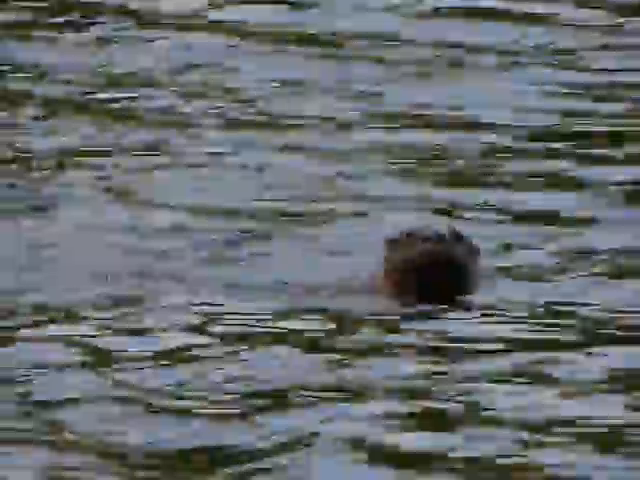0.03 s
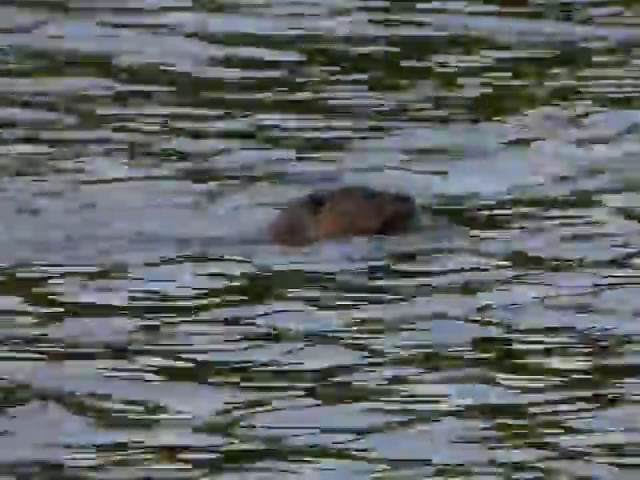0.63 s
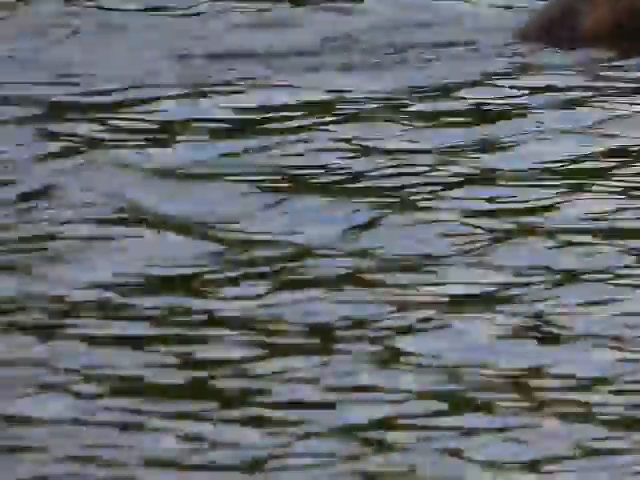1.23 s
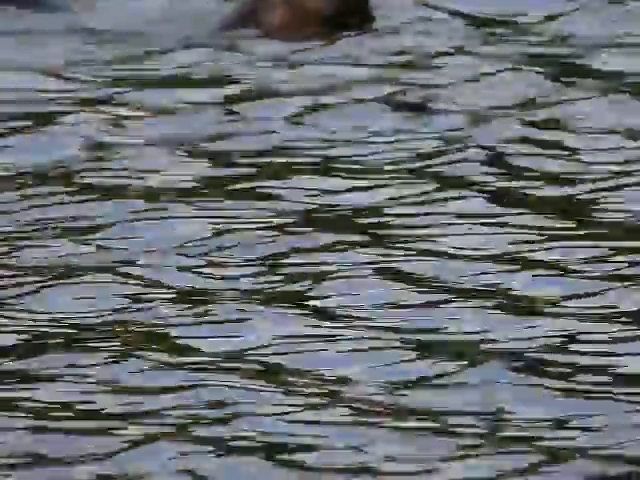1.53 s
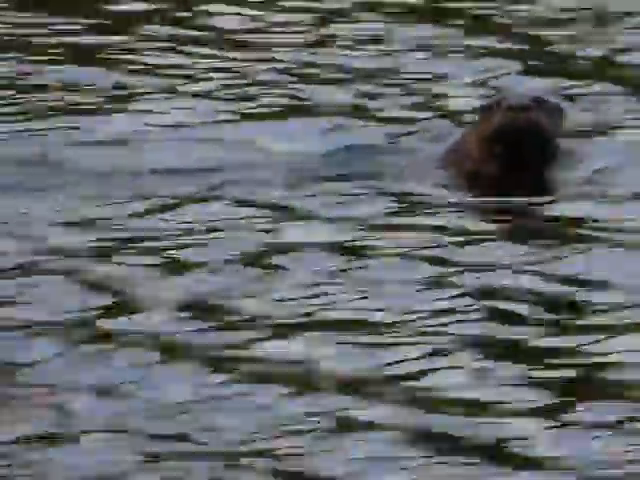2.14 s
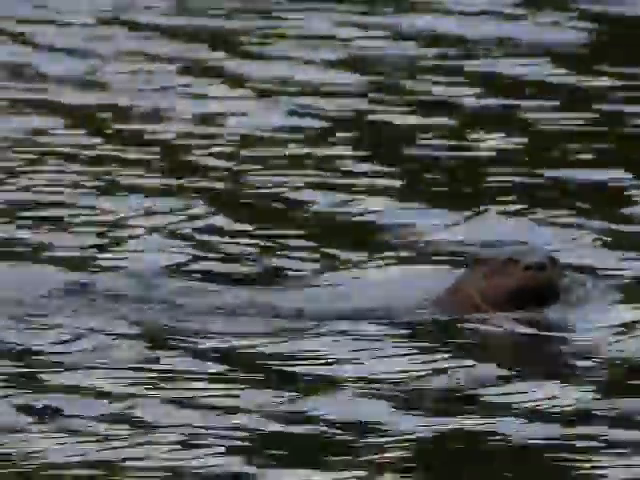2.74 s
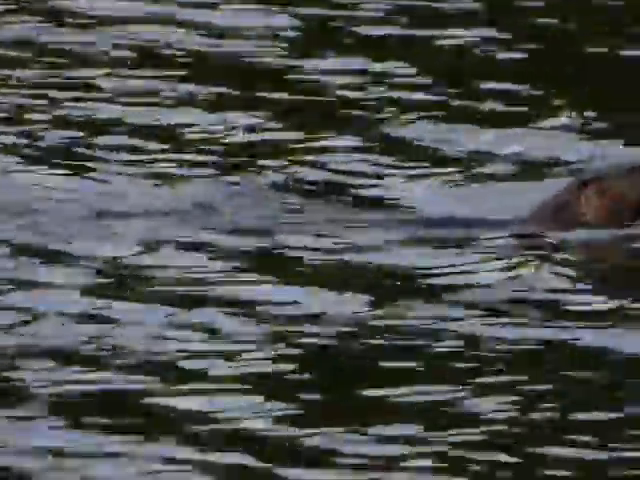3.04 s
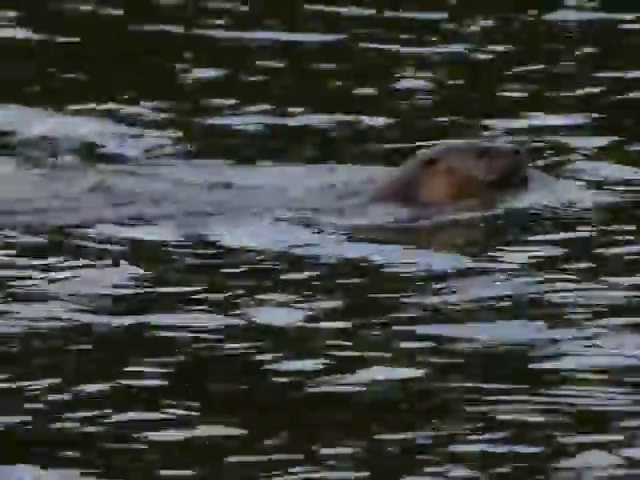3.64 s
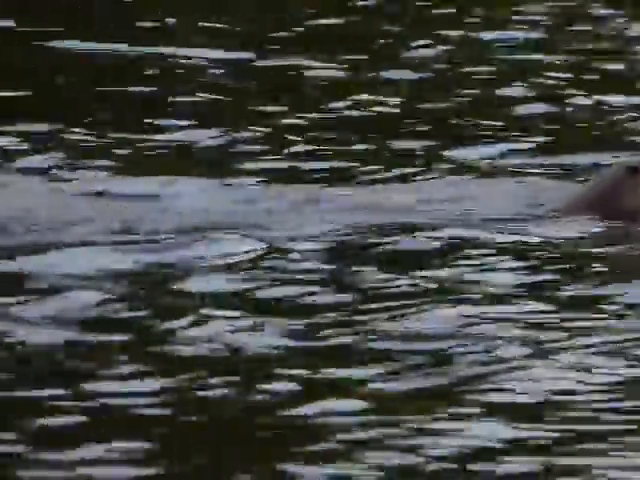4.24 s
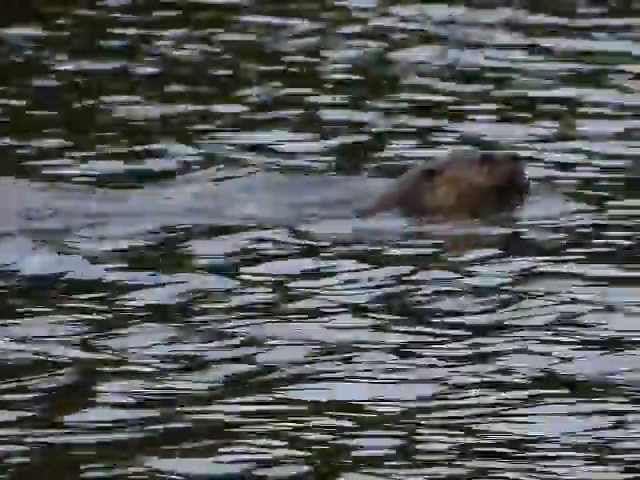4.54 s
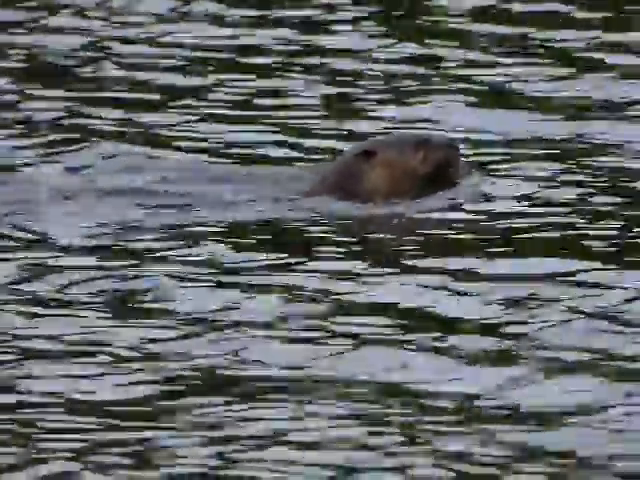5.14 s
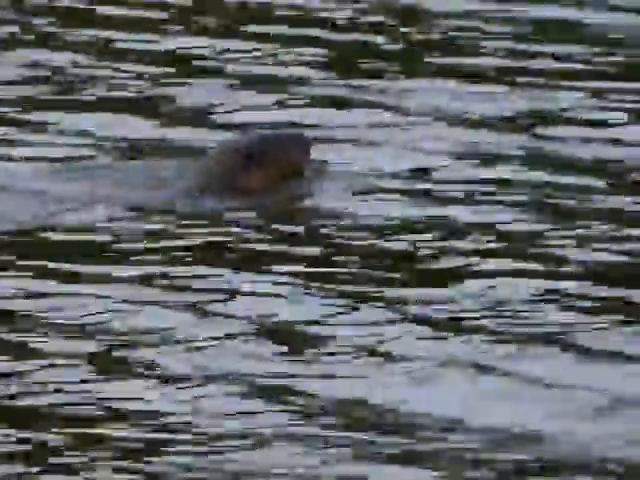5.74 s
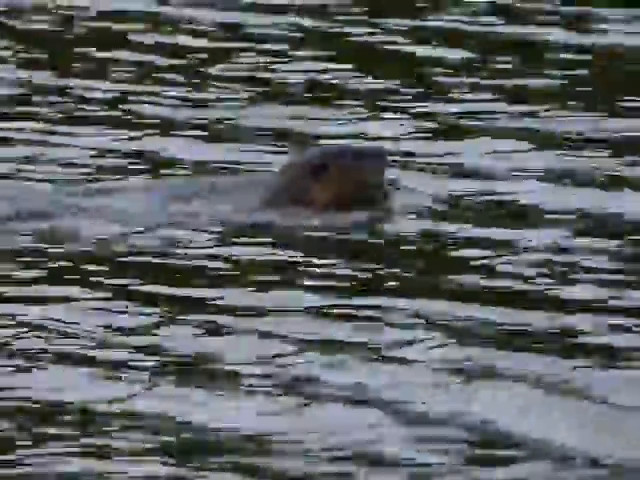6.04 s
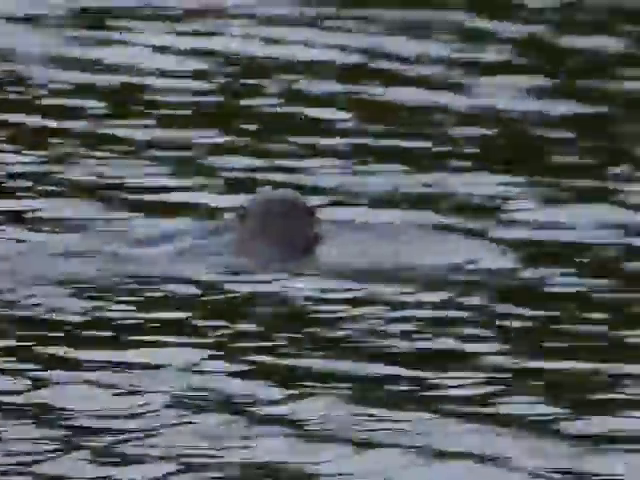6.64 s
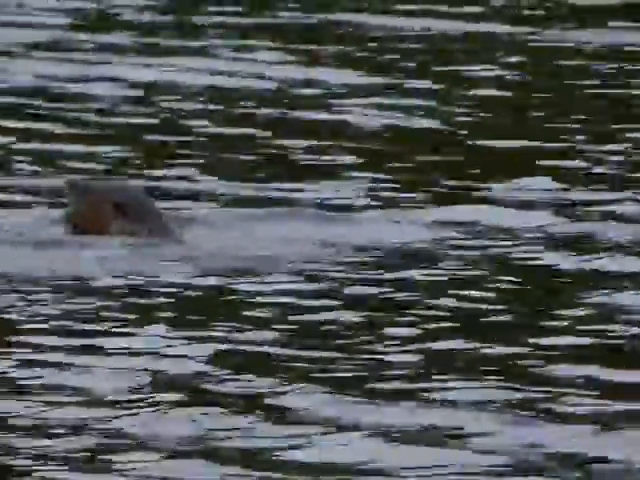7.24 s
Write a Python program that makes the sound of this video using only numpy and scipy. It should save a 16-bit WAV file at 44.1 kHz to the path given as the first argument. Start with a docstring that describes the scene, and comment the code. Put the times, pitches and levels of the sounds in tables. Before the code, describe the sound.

A river rushes softly with little bubbling wavelets while an otter whines again and again, thin squeaky calls that turn hoarse and grow fainter over time. Breathy puffs and three fluttering snorts fall between the calls, echoing slightly off the bank. A sharp click hits the hand-held microphone after the first whine; late on, a low bump and faint hand rub leave the water duller and quieter.

```python
"""Swimming otters whine: each call scoops up, sags and breaks into a rasp as the vocal folds beat unevenly.
Between calls they snort water from the nose, which sets the wet nostrils flapping.
The wooded bank echoes them over the steady rush of the river and the bubbles of small lapping waves.
A hand-held camera is knocked twice; at the second knock the hand rubs over the case and shades the
microphone, so the river turns muffled."""
import sys
import numpy as np
from scipy import signal
from scipy.fft import rfft, irfft, next_fast_len
from scipy.io import wavfile

SR = 44100
rng = np.random.default_rng(int(sys.argv[2]) if len(sys.argv) > 2 else 0)


def to_wav(sig):
    """Store sig (one row per channel, or 1-D mono) as 16-bit WAV at the path in sys.argv[1].

    Samples outside -1..1 are clipped; the rate is SR.
    """
    pcm = np.clip(np.atleast_2d(sig), -1, 1) * 32767
    pcm = np.round(pcm).astype(np.int16)
    wavfile.write(sys.argv[1], SR, pcm.T)  # frames by channels


N = 321930
T = np.arange(N) / SR

# Resonances of the throat: freq_hz, gain_db
THROAT_EQ = [(900, -17), (1800, -15), (2700, -10.5), (3300, -3.5), (3650, 1), (4500, -20), (5300, -0.5),
             (6300, -4), (7200, -5), (9000, -7.5), (10000, -31), (12000, -24), (15000, -52)]
# Air rasping in the throat: freq_hz, gain_db
RASP_EQ = [(1000, -25), (2200, -23), (2700, -24), (3000, 15), (3500, -14), (4000, 18), (4400, 2),
           (5100, 19), (6700, -32), (8800, -17), (10000, 4), (15000, -36)]
# One whine a row: start_s, length_s, break_after_s, pitch_hz, break_drop_hz, peak_db, swell_db_per_s,
# break_drop_db, bright_db, break_bright_db, break_roughness (0-1), mouth_hz, mouth_db, upper_start_hz
WHINES = [(0.866, 0.32, .165, 936, 51, -37.5, 123, 11, -17, 11, 0.6, 2700, 1, 5600),
          (1.564, 0.33, 0.18, 926, 48, -39.5, 55, 11, -16.5, 8.5, .6, 2700, 1.5, 5300),
          (1.793, 0.27, 0.13, 926, 3.04, -45, 10, 4.5, -18, 5.5, 0.26, 2700, -3, 5940),
          (2.941, 0.34, 0.16, 913, 69, -45.5, 40, 6.5, -3.5, -0.5, .6, 2760, 7, 5330),
          (3.542, .29, 0.19, 926, 55, -43, 37, 3, -9.5, 7.5, 0.84, 2860, 5, 4900),
          (4.638, 0.32, .19, 926, 20, -46.5, 15, 13, -14.5, 12, 0.7, 1830, 9, 5100),
          (6.447, .31, 0.16, 909, 44, -51.5, -2, 4, -5.5, 6, .5, 2700, -6, 5170),
          (7.11, .25, 0.14, 931, 46, -51.5, 54, 7.5, 3, 10.5, .3, 2700, -2.5, 6100)]


def whines(jitter=0.0237, quiver=0.00427, shimmer_db=2, air_db=-3, attack_s=0.0017, release_s=0.024):
    """Harmonics glide through the throat's resonances; the folds beat unevenly and air takes over."""
    mouth_width_hz, upper_width_hz, upper_db, climb_hz_per_s = 450, 320, 4.5, 6200
    fray_db, rough_fray_db = 1.9, 2.2
    out = np.zeros(N)
    wobble, tremor, flutter = wander(700), wander(90), wander(160)
    air = noise(RASP_EQ)
    upper_air = eq(air, [(4400, -46), (5200, -24)])
    harmonic = np.arange(1, 17)[:, None]
    fray = np.array([wander(35) for _ in harmonic])  # each harmonic wavers on its own
    for start, length, *contour, mouth_hz, mouth_db, upper_start_hz in WHINES:
        on = (T > start - .05) & (T < start + length + .12)
        age = T[on] - start
        pitch_hz, level_db, bright_db, rough = whine_contour(age, *contour)
        detune = jitter * rough * wobble[on] + quiver * tremor[on]
        phase = 2 * np.pi * np.cumsum(pitch_hz * (1 + detune)) / SR
        hz = harmonic * pitch_hz
        upper_hz = upper_start_hz + climb_hz_per_s * age  # this resonance climbs as the mouth opens
        lift_db = mouth_db * np.exp(-((hz - mouth_hz) / mouth_width_hz) ** 2)
        lift_db += upper_db * np.exp(-((hz - upper_hz) / upper_width_hz) ** 2)
        lift_db += (harmonic > 5) * bright_db
        lift_db += (fray_db + rough_fray_db * rough) * fray[:, on]
        voice = np.sum(eq_gain(hz, THROAT_EQ) * gain(lift_db) * np.sin(harmonic * phase), axis=0)
        rasp = air[on] + (gain(bright_db) - 1) * upper_air[on]
        blend = np.sqrt(2 * (1 - rough ** 2)) * voice + gain(air_db) * rough * rasp
        gate = np.exp(np.minimum(age, 0) / attack_s - np.maximum(age - length, 0) / release_s)
        out[on] += gate * gain(level_db + shimmer_db * rough * flutter[on]) * blend
    return out


def whine_contour(age, break_after_s, pitch_hz, drop_hz, peak_db, swell_db_per_s, drop_db,
                  bright_db, break_bright_db, break_rough):
    """One whine scoops up, swells as it sags, then breaks to a lower, rougher note and fades."""
    scoop_s, scoop_hz, scoop_db, scoop_bright_db, scoop_rough = .012, 150, -6, 2.5, 0.472
    sag_hz_per_s, clear_rough, break_s, fade_db_per_s = 150, 0.1, .035, 20
    scoop = np.exp(-np.maximum(age, 0) / scoop_s)
    broken = (1 + np.tanh((age - break_after_s) / break_s)) / 2
    below_peak_db = swell_db_per_s * np.maximum(break_after_s - break_s - age, 0)
    fade_db = fade_db_per_s * np.maximum(age - break_after_s, 0)
    hz = pitch_hz - scoop_hz * scoop - sag_hz_per_s * age - drop_hz * broken
    level_db = peak_db + scoop_db * scoop - below_peak_db - drop_db * broken - fade_db
    # The upper harmonics lead at the onset and take only part of the swell.
    top_db = bright_db + scoop_bright_db * scoop + .45 * below_peak_db + break_bright_db * broken
    rough = clear_rough + scoop_rough * scoop + (break_rough - clear_rough) * broken
    return hz, level_db, top_db, np.clip(rough, 0, 1)


# Puffs of air through the nose: peak_s, level_db, width_s
NOSE_PUFFS = [(.64, -58, 0.16), (1.52, -55, 0.08), (2.81, -67, 0.045), (3.165, -48, 0.053),
              (3.47, -73, .04), (4.605, -52, 0.047), (5.155, -67, .023), (5.835, -57.5, .032),
              (5.9, -56.5, .023), (6.25, -68, .04)]
# Hiss of a puff: freq_hz, gain_db
PUFF_EQ = [(1000, -3), (2500, -12), (4200, -5), (5300, 2.5), (6800, -3.5), (8200, 2), (9500, -4.5),
           (10800, -2), (13000, -20), (15500, -30)]
# Wet nostril rattles: start_s, length_s, level_db
NOSTRIL_RATTLES = [(1.507, .1, -41.5), (3.167, .2, -38), (4.596, .125, -44.5)]
# Nasal tone of a rattle: freq_hz, gain_db
NOSE_EQ = [(500, -21), (1500, -2.5), (2100, -5.5), (2600, 3.5), (3050, -9), (3500, -9), (4300, -15),
           (5300, -13), (8000, -17.5), (14000, -58)]


def snorts(flutter_db=1.6):
    """Air hisses through the nose and sets the wet nostrils flapping."""
    blow = sum(gain(db) * np.exp(-np.abs((T - s) / width) ** 2.1 / 2) for s, db, width in NOSE_PUFFS)
    flaps = sum(nostril_flaps(*rattle) for rattle in NOSTRIL_RATTLES)
    return blow * gain(flutter_db * wander(90)) * noise(PUFF_EQ) + flaps * noise(NOSE_EQ)


def nostril_flaps(start_s, length_s, level_db, rate_hz=48, jitter=0.21, scatter_db=2, fade_db_per_s=55):
    """Envelope of one rattle: the nostrils flap at an uneven rate, weaker as the air runs out."""
    gap, size = rng.standard_normal((16, 2)).T
    periods = np.exp(jitter * gap) / rate_hz
    age = np.cumsum(periods) - periods[0]
    flap_db = level_db + scatter_db * size - fade_db_per_s * age
    on = age < length_s
    return bursts(start_s + age[on], flap_db[on], rise_s=0.0029, fall_s=0.0067)


# Slapback from the bank: delay_s, level_db
BANK_ECHOES = [(0.084, -26), (0.149, -25), (0.233, -21.5)]


def bank_echo(x, t60_s=0.71, tail_db=-13, build_s=0.014, smear_s=0.011, width=0.31):
    """A few smeared echoes off the bank and a diffuse tail from the trees, dull in the treble."""
    t = T[:SR]
    returns = []
    for grain in rng.standard_normal((2, SR)):
        tail = grain * (1 - np.exp(-t / build_s)) * np.exp(-np.log(1000) * t / t60_s)
        response = gain(tail_db) * tail / np.linalg.norm(tail)
        for delay_s, db in BANK_ECHOES:
            echo = grain * np.exp(-np.abs(t - delay_s) / smear_s)
            response += gain(db) * echo / np.linalg.norm(echo)
        wet = signal.fftconvolve(x, response)[:N]
        returns.append(eq(wet, [(3700, 5), (5500, 3.5), (12000, 0)]))
    mid, side = returns
    return mid + width * side * np.array([[1], [-1]])


# Hits that make up the two knocks: start_s, click_db, skid_db, case_db, thump_db
KNOCK_HITS = [(1.235, -37, -55, -48, -61), (1.2507, -23.5, -47, -12.5, -44), (6.617, -42, -49, -55, -65),
              (6.661, -49, -58, -38, -43), (6.6761, -30.5, -36.5, -39, -19)]
# Crack of a hit: freq_hz, gain_db
CLICK_EQ = [(80, -35), (300, -33), (1300, 12), (2700, 2), (5000, 4), (6600, 7), (9500, 0), (11000, 0),
            (12000, -48), (15000, -22)]
# Skin sliding on plastic: freq_hz, gain_db
SKIN_EQ = [(2500, -29), (5000, 10.5), (7000, -1), (10000, 0), (12500, -1), (15000, -16)]
# Ringing modes of the case: pitch_hz, level_db, t60_s
CASE_MODES = [(860, -36, 0.022), (1280, -19, 0.025), (1333, -8.5, 0.025), (1900, -19.5, 0.02),
              (2650, -16, 0.013), (3470, -16, 0.02), (4880, -18, 0.02)]
# Low modes of the gripped camera body: pitch_hz, level_db, t60_s
BODY_MODES = [(195, -31, 0.17), (278, -18, 0.074), (368, -5, 0.089), (764, -6.5, 0.024)]


def camera_knocks(case_lag_s=0.00221, thump_lag_s=.0063, rebound_s=0.009, rebound_db=-7):
    """Each hit cracks under a skidding finger, rings the case and thumps the body, which rebounds once."""
    times, click_db, skid_db, case_db, thump_db = np.transpose(KNOCK_HITS)
    clack = bursts(times, click_db, rise_s=0.00046, fall_s=0.0014) * noise(CLICK_EQ)
    skid = bursts(times, skid_db, rise_s=0.001, fall_s=0.0031) * noise(SKIN_EQ)
    case, body = ring(CASE_MODES), ring(BODY_MODES)
    thump = np.zeros(N)
    for start, ring_db, low_db in zip(times, case_db, thump_db):
        add(clack, start + case_lag_s, gain(ring_db) * case)
        add(thump, start + thump_lag_s, gain(low_db) * body)
        add(thump, start + thump_lag_s + rebound_s, gain(low_db + rebound_db) * body)
    return pan(clack, -6.0) + pan(thump, 4.0) + skid


def ring(modes):
    """Damped modes after one blow; the small body radiates no deep bass."""
    t = T[:SR // 8]
    sound = sum(gain(db) * np.sin(2 * np.pi * hz * t) * np.exp(-np.log(1000) * t / t60_s)
                for hz, db, t60_s in modes)
    return signal.sosfilt(signal.butter(5, 185, "high", fs=SR, output="sos"), sound)


def hand_rub(start_s=6.64, length_s=0.466, level_db=-61, edge_s=.03):
    """The hand slides over the case with a faint, even hiss."""
    outside_s = np.maximum(np.maximum(start_s - T, T - start_s - length_s), 0)
    return gain(level_db) * np.exp(-outside_s / edge_s) * noise(SKIN_EQ)


# Wavelets that stand out: start_s, pitch_hz, level_db
WAVELETS = [(1.42, 987, -33), (3.365, 453, -39)]


def lapping(count=150, floor_db=-49, spread_db=2.5, cycles=7, glide=0.084):
    """Wavelets trap bubbles that swell, ring briefly and rise in pitch."""
    out, t = np.zeros(N), T[:SR // 12]
    small = [(when * T[-1], 450 * 3.2 ** pitch, floor_db - spread_db * np.log(1 - .97 * strength))
             for when, pitch, strength in rng.random((count, 3))]
    for start, hz, db in WAVELETS + small:
        age = t * hz / cycles
        swell = 2 * age * np.exp(1 - 2 * age)
        bubble = np.sin(2 * np.pi * hz * t * (1 + glide * np.tanh(age)))
        add(out, start, gain(db) * swell * bubble)
    return out


# Rush of the water: freq_hz, gain_db
RUSH_EQ = [(30, -20), (70, -39), (125, -41), (165, -16.5), (200, -9.5), (270, -4), (450, -0.5), (720, 2.5),
           (1000, 1.5), (1400, -5), (1900, -9.5), (2500, -16), (4000, -21), (9000, -69)]
# Muffling by the hand: freq_hz, gain_db
SHADE_EQ = [(350, 3.5), (700, -3), (1000, -2.5), (1500, -4), (2400, -1.5)]
# Fine hiss on top: freq_hz, gain_db
HISS_EQ = [(1500, 5.5), (2300, 1), (3300, -4), (4200, 0.5), (5200, 5.5), (6800, -1.5), (8200, 0),
           (10000, -5), (13000, -12.5), (15500, -19.5)]
# Stereo width of the river bed: freq_hz, side_minus_mid_db
RIVER_WIDTH = [(60, -34), (110, -35), (200, -13.5), (380, -18.5), (700, -2), (1290, -7.5), (2380, -8.5),
               (4400, -8), (8120, -5), (15000, -4.5)]
# Its stereo balance: freq_hz, left_minus_right_db
RIVER_BALANCE = [(150, -1), (380, 2.1), (700, -2), (1290, 3.5), (2380, 1.5), (4400, 0.5), (15000, 0)]


def river(rush_db=-41.5, hiss_db=-56.5, fade_db_per_s=0.3764):
    """Water rushes under an even hiss; the rush dulls and fades faster once the hand shades the mic."""
    shade_start_s, shade_ramp_s, shade_db_per_s = 6.68, 0.047, 5.5
    shaded_s = np.maximum(T - shade_start_s, 0)
    shade = np.minimum(shaded_s / shade_ramp_s, 1)
    level_db = rush_db - fade_db_per_s * T - shade_db_per_s * shaded_s
    surge = gain(level_db + .5 * wander(6.7) + 0.61 * wander(45))
    layers = []
    for _ in range(2):
        rush = surge * noise(RUSH_EQ)
        layers.append((1 - shade) * rush + shade * eq(rush, SHADE_EQ) + gain(hiss_db) * noise(HISS_EQ))
    mid, side = layers[0], eq(layers[1], RIVER_WIDTH)
    return np.array([eq(mid + sign * side, [(hz, sign * db / 2) for hz, db in RIVER_BALANCE])
                     for sign in (1, -1)])


def gain(db):
    """Decibels to gain."""
    return 10 ** (np.asarray(db) / 20)


def eq_gain(hz, curve):
    """Gain of a (freq_hz, gain_db) curve at the given frequencies."""
    freq_hz, gain_db = np.transpose(curve)
    return gain(np.interp(np.log(hz + 1), np.log(freq_hz), gain_db))


def eq(x, curve):
    """Filter a sound by a (freq_hz, gain_db) curve."""
    size = next_fast_len(len(x))
    return irfft(rfft(x, size) * eq_gain(np.fft.rfftfreq(size, 1 / SR), curve), size)[:len(x)]


def noise(curve):
    """Coloured noise of rms 1."""
    x = eq(rng.standard_normal(N), curve)
    return x / np.sqrt(np.mean(x ** 2))


def wander(rate_hz):
    """Random modulation with a spread near 1."""
    return np.interp(T * rate_hz, np.arange(N), rng.standard_normal(N)) * np.sqrt(3 / 2)


def add(out, start_s, x):
    """Mix a short sound in."""
    i = int(start_s * SR)
    out[i:i + len(x)] += x[:max(N - i, 0)]


def bursts(starts_s, peaks_db, rise_s, fall_s):
    """Envelope of short swells that peak and die away."""
    out, t = np.zeros(N), T[:SR // 8]
    swell = (1 - np.exp(-t / rise_s)) * np.exp(-t / fall_s)
    for start, db in zip(starts_s, peaks_db):
        add(out, start, gain(db) * swell / swell.max())
    return out


def pan(x, left_minus_right_db):
    """Place a mono sound in stereo."""
    return x * gain(np.array([[1], [-1]]) * left_minus_right_db / 2)


def scene():
    """The otters and their echo, the water, and the camera in the hand."""
    otters = whines() + snorts()
    riverside = pan(otters, 0.95) + bank_echo(otters) + river() + pan(lapping(), -.8)
    return riverside + camera_knocks() + hand_rub()


def record(dry, open_s=.547, dc_offset=-.007, top_hz=15500):
    """The mic housing adds a low resonance and notch; the converter sits off zero and cuts the top."""
    housing_eq = [(300, -1.5), (345, 4.0), (368, -4.5), (390, -17), (412, 0.0), (450, 0)]
    sound = np.array([eq(channel, housing_eq) for channel in dry])
    gated = (sound + dc_offset) * (T >= open_s)  # silent until open_s
    return signal.sosfilt(signal.ellip(8, .2, 70, top_hz, fs=SR, output="sos"), gated)


dry = scene()
out = record(dry)
to_wav(out)
```